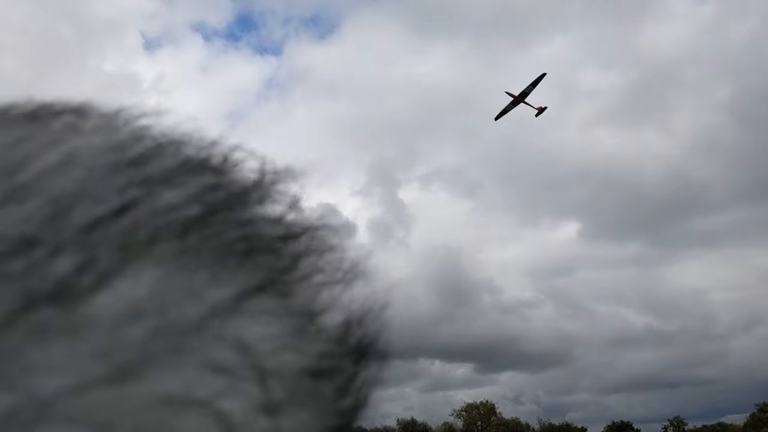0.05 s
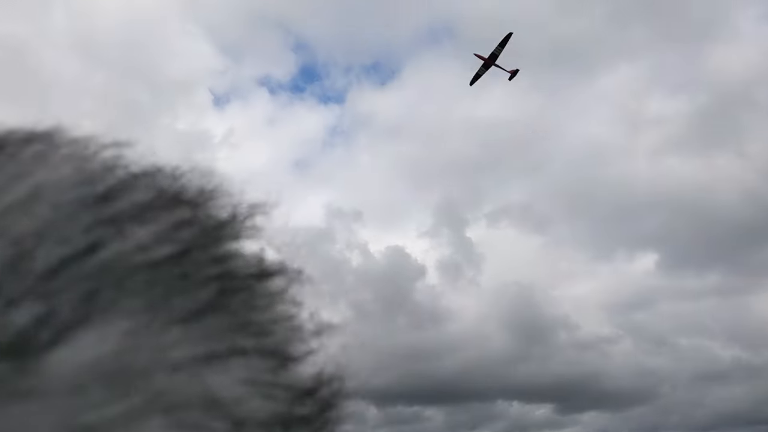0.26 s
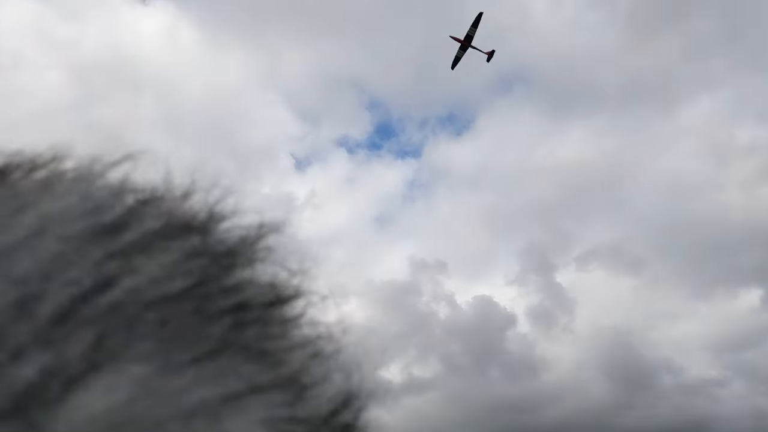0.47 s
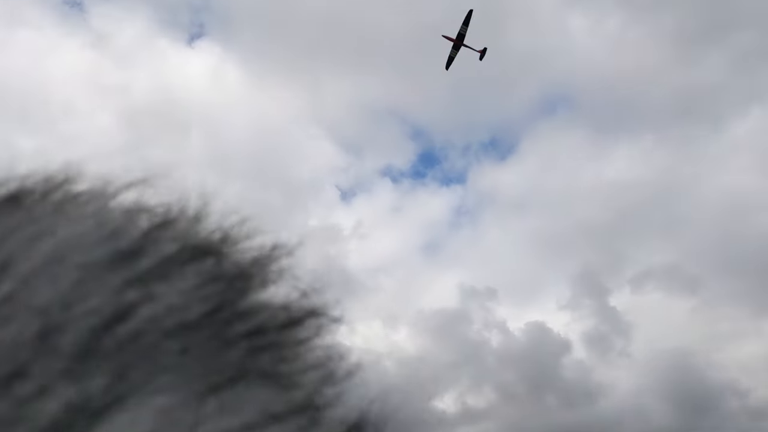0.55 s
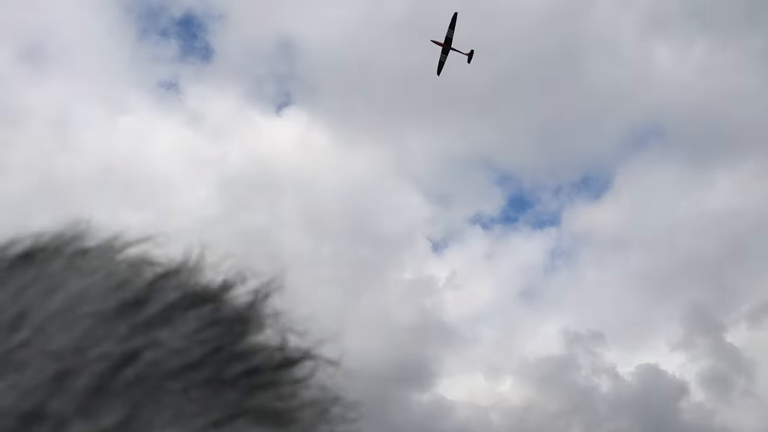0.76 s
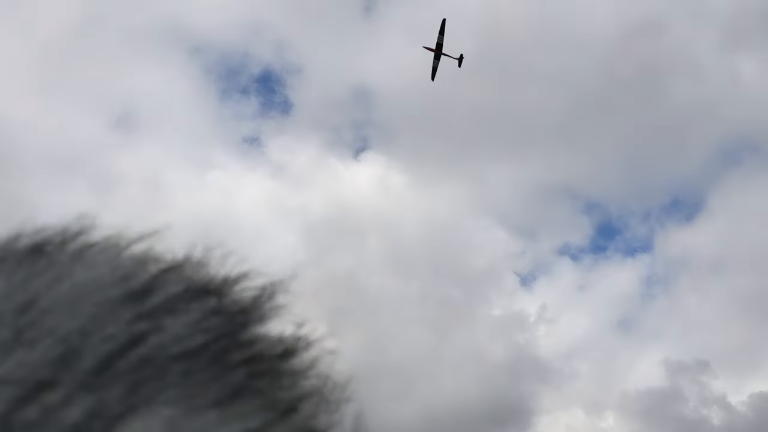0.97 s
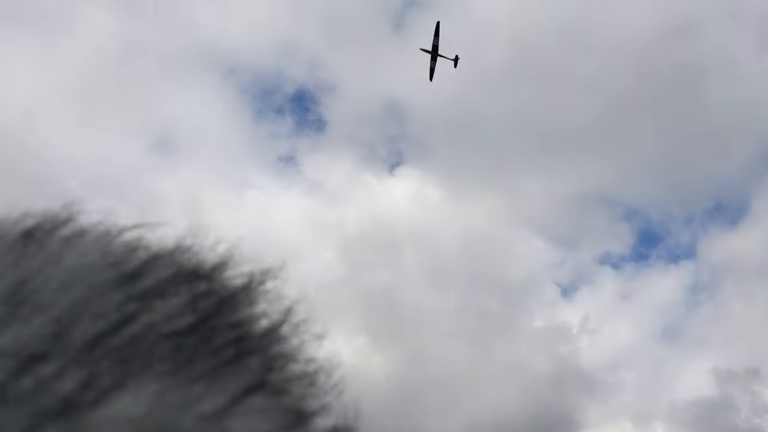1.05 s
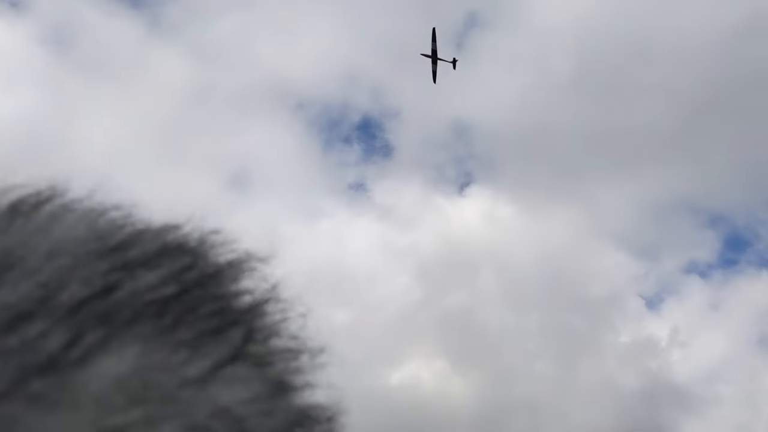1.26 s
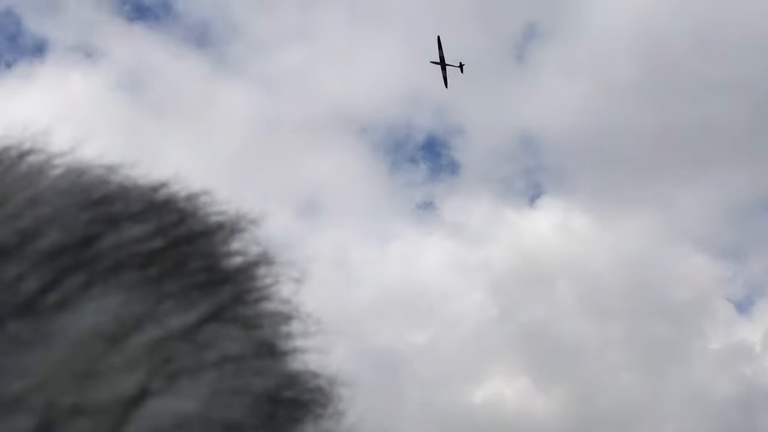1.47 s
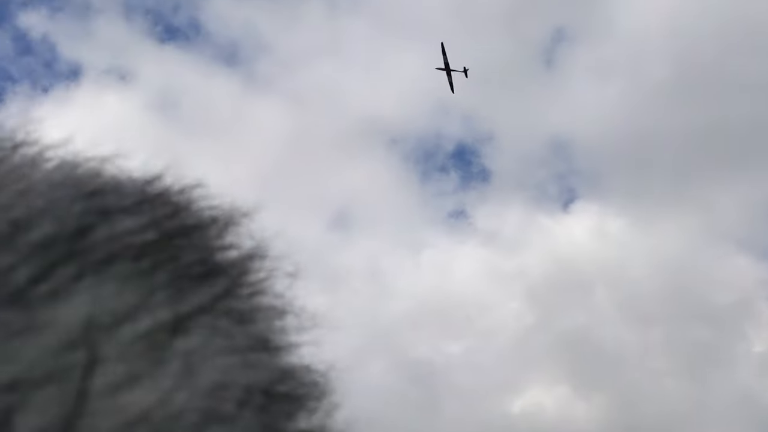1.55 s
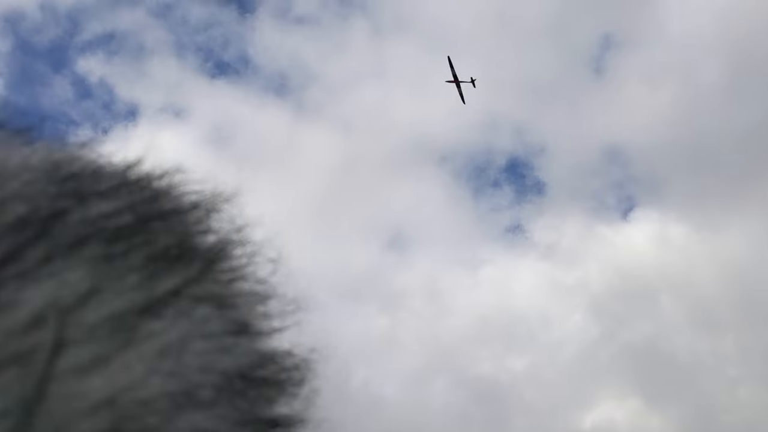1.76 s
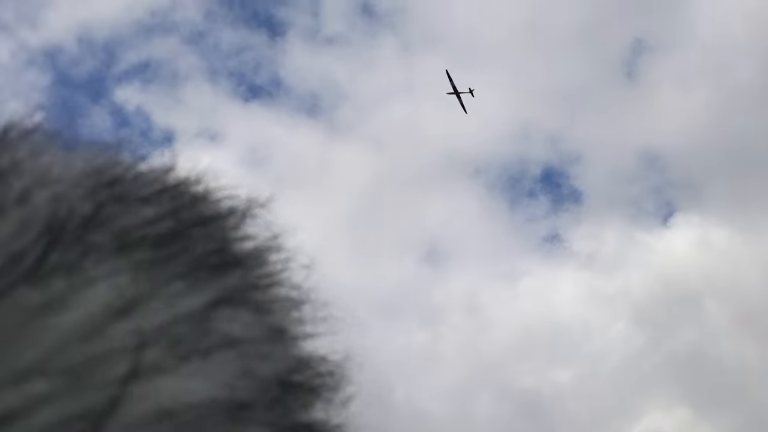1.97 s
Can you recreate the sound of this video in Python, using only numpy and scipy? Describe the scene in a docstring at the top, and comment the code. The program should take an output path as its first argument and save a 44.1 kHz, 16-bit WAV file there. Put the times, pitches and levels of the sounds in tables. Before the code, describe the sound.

A model plane sweeps close overhead in an open field: a turbulent roar and bright hiss swell quickly, a fuzzy whistle climbs to a thin whine, then the air fades. Close stereo microphones, duller on the left.

```python
"""For two seconds a small model plane passes fast overhead in an open field, over a low rumble and faint air.
From the start, air tears over it as shaped noise: a roar, a rush and a gusty hiss that swell as it nears.
A fuzzy whistle, a wavering tone mixed with narrow noise, climbs as it turns in, then holds as a thin whine.
Near the end the airflow and whine fall away. A close pair of microphones hears the plane,
the left one later and duller."""
import sys
import numpy as np
from scipy import signal
from scipy.fft import rfft, irfft
from scipy.io import wavfile
from scipy.ndimage import uniform_filter1d

SR = 44100
rng = np.random.default_rng(int(sys.argv[2]) if len(sys.argv) > 2 else 0)


def unload_wav(signal):
    """Save mono or channel-first audio to the path in sys.argv[1] as 16-bit WAV at rate SR, clipped to [-1, 1]."""
    wavfile.write(
        sys.argv[1],
        SR,
        np.round(np.clip(np.atleast_2d(signal).T, -1, 1) * 32767).astype(np.int16),
    )


N = 88200  # samples: two seconds

TURN_S = (.45, 1.0)  # the turn from approaching to overhead starts and ends here
FRAME, HOP = 512, 128  # short-time spectra: length and step in samples

# Level of the treble hiss, which surges and dips: (time [s], level [dB])
HISS = [(0, -29), (0.05, -17), (0.13, -14.5), (0.15, -18.5), (0.2, -15.5), (0.275, -3.5), (0.39, -5),
        (0.43, -0.3), (0.47, -2.3), (0.52, -1.5), (0.58, 5.5), (0.62, -3.1), (0.68, 5.7), (0.76, -1.9),
        (0.81, -3), (0.87, -10), (0.925, 5.1), (0.955, 2.5), (0.982, 4.6), (1.017, -10), (1.057, 5),
        (1.1, 1.3), (1.135, 2.8), (1.165, -7.8), (1.21, -1.3), (1.26, -3.9), (1.29, 0.2), (1.315, -4),
        (1.34, 1), (1.38, 3.4), (1.44, -6.5), (1.52, -3.8), (1.61, -5.5), (1.655, -2), (1.695, -2.3),
        (1.72, -11), (1.775, -23), (1.83, -19), (1.845, -22), (1.87, -17.5), (1.93, -27.5), (2, -27.8)]
# How strongly each pitch belongs to the hiss: (frequency [Hz], share [0-1])
HISS_BAND = [(4000, 0), (7000, .75), (9500, 1)]


def amp(db):
    """Turns decibels into gain."""
    return 10 ** (np.asarray(db) / 20)


def unit(x):
    """Scales to an rms of 1."""
    return x / np.sqrt(np.mean(x ** 2) + 1e-20)


def curve(points, at):
    """Reads a two-column table along straight lines."""
    return np.interp(at, *np.transpose(points))


def spectrum(points, hz):
    """Reads every value column of a table on a log-frequency axis."""
    table_hz, *columns = np.transpose(points)
    return [np.interp(np.log(hz + 1), np.log(table_hz), column) for column in columns]


def frames(x):
    """Splits sound into short-time spectra: frequencies as a column, times, values."""
    hz, t, z = signal.stft(x, SR, nperseg=FRAME, noverlap=FRAME - HOP)
    return hz[:, None], t, z


def sound(z):
    """Turns short-time spectra back into samples."""
    return signal.istft(z, SR, nperseg=FRAME, noverlap=FRAME - HOP)[1][..., :N]


def noise():
    """White noise of 0 dB per Hz."""
    return rng.standard_normal(N) * np.sqrt(SR / 2)


def narrow_noise(hz, width_hz):
    """Noise through two equal resonance stages, each width_hz wide, moved up to the pitch hz."""
    r = np.exp(-np.pi * width_hz / SR)
    z = rng.standard_normal(2 * N) + 1j * rng.standard_normal(2 * N)
    for _ in range(2):
        z = signal.lfilter([1 - r], [1, -r], z)
    z = z[N:]  # the first half only lets the filter settle
    turns = np.cumsum(hz * np.ones(N)) / SR
    return unit((z * np.exp(2j * np.pi * turns)).real)


def wander(per_s):
    """Random wavering of rms 1 with no motion quicker than per_s cycles a second."""
    slow_enough = np.fft.rfftfreq(N, 1 / SR) < per_s
    return unit(irfft(rfft(rng.standard_normal(N)) * slow_enough, N))


def passing(table, hz, t):
    """Blends a table from its approaching to its overhead column as the plane turns in."""
    # Early on, the treble already has part of its overhead values: (time [s], share [0-1])
    early_share = [(.15, .6), (.27, 0)]
    before, after = spectrum(table, hz)
    share = np.interp(t, TURN_S, [0, 1]) + curve(HISS_BAND, hz) * curve(early_share, t)
    return before + (after - before) * share


def background():
    """Faint outdoor air is noise shaped by pitch; the low rumble is noise in a narrow resonance."""
    # Outdoor air: (frequency [Hz], level [dB per Hz])
    floor = [(15, -76), (35, -66.5), (65, -78), (100, -81.5), (160, -84.5), (1000, -90), (2700, -106),
             (15000, -115)]
    rumble_hz, rumble_width_hz, rumble_db = 47.7, 6.2, -50.5
    same = 0.86  # likeness of the air at the two microphones (0-1)
    gain = amp(spectrum(floor, np.fft.rfftfreq(N, 1 / SR))[0])
    left, other = irfft(rfft([noise(), noise()]) * gain, N)
    right = same * left + np.sqrt(1 - same ** 2) * other
    rumble = amp(rumble_db) * narrow_noise(rumble_hz, rumble_width_hz)
    return np.array([left, right]) + rumble


def airflow():
    """Turbulent air is noise with moving levels; gives two unrelated draws as short-time spectra."""
    # Colour before the moving levels: (frequency [Hz], approaching [dB per Hz], overhead [dB per Hz])
    air_colour = [(231, -65, -68), (450, -67, -66.5), (626, -66.5, -60.5), (930, -69, -63),
                  (1280, -58.5, -54.5), (1637, -60.5, -60.5), (2150, -67, -62.5), (2500, -67.5, -61),
                  (2950, -63, -60), (3610, -66.5, -56.7), (4000, -65.5, -57.5), (5400, -63.5, -59),
                  (6100, -56, -61), (6350, -58.5, -57.5), (7670, -61.5, -61), (8440, -63, -55.5),
                  (8450, -64.5, -52.5), (9200, -56.5, -56), (10840, -55.5, -55.5), (13800, -67.5, -63.5),
                  (15900, -78, -70.5)]
    # Level of the low roar: (time [s], level [dB])
    roar_level = [(0, -7), (0.12, -1.5), (0.33, -0.5), (0.6, 2.8), (0.8, 0), (0.98, 1), (1.3, -1),
                  (1.6, -2.5), (1.67, 1.9), (1.76, -5.5), (2, -6)]
    # Level of the middle rush: (time [s], level [dB])
    rush_level = [(0, -14.0), (0.13, -8), (0.22, -10), (0.3, -4), (0.48, 0), (0.61, 0.1), (0.67, 6),
                  (0.76, 0), (0.83, 2), (0.9, 2), (1.08, 0.5), (1.29, 1.5), (1.5, -3.5), (1.69, -4),
                  (1.73, -9.5), (1.9, -12.5), (1.96, -18.5), (2, -15)]
    # How strongly each pitch follows the roar: (frequency [Hz], share [0-1])
    roar_band = [(250, .4), (1300, 1), (3000, 0)]
    # How strongly each pitch follows the rush: (frequency [Hz], share [0-1])
    rush_band = [(1300, 0), (3000, 1), (4500, 1), (7000, .35), (9500, 0)]
    # How strongly each pitch follows the drifting patches: (frequency [Hz], share [0-1])
    patch_band = [(600, .3), (4000, 1)]
    patch_db, flicker_db = 1.83, .5  # rms of the patches and the flicker at full share
    doppler_per_s, overhead_s = 0.046, 1.0  # the colour slides down by this share a second

    hz, t, z = frames(noise())
    # turbulence: patches in pitch and time, and a quick flicker of the treble
    patches = uniform_filter1d(rng.standard_normal(z.shape), size=7, axis=0)
    patches = unit(uniform_filter1d(patches, size=12, axis=1))
    flicker = unit(uniform_filter1d(rng.standard_normal(len(t)), size=3))
    emitted_hz = hz * np.exp(doppler_per_s * (t - overhead_s))  # unshifted when overhead

    db = passing(air_colour, emitted_hz, t)
    db = db + patch_db * curve(patch_band, hz) * patches
    db = db + curve(roar_band, hz) * curve(roar_level, t)
    db = db + curve(rush_band, hz) * curve(rush_level, t)
    db = db + curve(HISS_BAND, hz) * (curve(HISS, t) + flicker_db * flicker)
    return np.array([z, frames(noise())[2]]) * amp(db)


def whistle():
    """A thin wavering tone in a breathy skirt of noise: it climbs, settles, and surges with the hiss."""
    # Pitch: (time [s], frequency [Hz])
    whistle_pitch = [(.1, 8200), (.2, 8900), (.26, 9500), (.33, 10200), (.42, 11150), (.48, 11950),
                     (.59, 13000), (.75, 12680), (1.05, 12630), (1.18, 12700), (1.33, 12600), (1.8, 12570)]
    # Strength, added to the hiss level: (time [s], level [dB])
    whistle_level = [(.19, -37), (.27, -16), (.41, -14.5), (.5, -21.5), (.57, -33), (.7, -35), (.8, -31),
                     (.95, -29), (1.25, -25), (1.4, -30), (1.65, -30.5), (1.78, -42)]
    climb_skirt, hold_skirt = .8, .25  # share of the power in the skirt
    skirt_width_hz = 600  # width of each resonance stage
    waver_hz, waver_per_s, flutter_db = 55, 60, 2.5  # rms of pitch, top speed, rms of level

    t = np.arange(N) / SR
    hz = curve(whistle_pitch, t)
    skirt = np.interp(t, TURN_S, [climb_skirt, hold_skirt])
    turns = np.cumsum(hz + waver_hz * wander(waver_per_s)) / SR
    core = unit(np.sin(2 * np.pi * turns) * amp(flutter_db * wander(waver_per_s)))
    tone = np.sqrt(1 - skirt) * core + np.sqrt(skirt) * narrow_noise(hz, skirt_width_hz)
    return tone * amp(curve(whistle_level, t) + curve(HISS, t))


def plane():
    """Airflow and whistle reach the right microphone first and the left one later and shaded.
    Near 2.8 and 8.3 kHz the two are about equally loud and half a cycle apart,
    so they largely cancel there if the two channels are added together."""
    # Left against right level: (frequency [Hz], approaching [dB], overhead [dB])
    shade = [(200, 0.4, 0.5), (900, -1, -1.7), (1400, -4, -3), (1800, -6.5, -6), (2150, -2, -1),
             (2450, 1, 1), (2650, 0, 0.2), (3000, -0.2, -0.1), (3700, -3, -4), (5400, -8.5, -7),
             (6200, -6, -4), (7000, -8.5, -4), (7700, -4, -1), (8200, 0, -2), (8550, -0.3, -4),
             (9000, -6, -7), (9800, -13, -13), (11000, -19, -17), (12000, -14, -20), (12650, -15, -13.5),
             (13500, -27, -22), (15000, -29, -25)]
    # Likeness of the airflow at the two microphones: (frequency [Hz], likeness [0-1])
    likeness = [(200, .99), (1400, .98), (1950, .86), (2250, .85), (2450, .96), (2600, .9995),
                (3000, .9995), (3200, .95), (3600, .87), (5400, .8), (6200, .9), (7600, .8), (8150, .96),
                (8500, .96), (8900, .85), (10200, .82), (11000, .65), (12650, .75), (14000, .3)]
    # Lag of the left microphone: (time [s], lag [ms])
    lag_ms = [(0, .189), (.25, .183), (.42, .187), (.7, .181), (.95, .174), (1.1, .179), (1.25, .174),
              (1.6, .172), (2, .165)]
    # Phase that the body holding the microphones adds at the left:
    # (frequency [Hz], approaching [radians], overhead [radians])
    bend = [(200, 0, 0), (1300, -.4, -.25), (1750, -.15, -.2), (2150, .65, .7), (2550, -.08, 0),
            (3000, .1, -.02), (4000, -.3, 0), (5800, .5, .55), (7600, 1.1, .7), (8100, .05, .1),
            (8600, .5, 0), (9100, -.4, 0), (10500, .1, .3), (12500, 1.1, 1.6)]
    low_cut_hz = 232

    hz, t, tone = frames(whistle())
    air, other = airflow()
    same = np.clip(spectrum(likeness, hz)[0], 0, 1)
    left_air = same * air + np.sqrt(1 - same ** 2) * other
    left = (left_air + tone) * amp(passing(shade, hz, t))
    lag_phase = 2 * np.pi * hz * curve(lag_ms, t) / 1000
    left = left * np.exp(1j * (passing(bend, hz, t) - lag_phase))
    right = air + tone
    low_cut = signal.butter(6, low_cut_hz, "high", fs=SR, output="sos")
    return signal.sosfilt(low_cut, sound(np.array([left, right])))


def scene():
    """The plane over the quiet field."""
    return plane() + background()


def record(dry):
    """The recorder rounds off the highest peaks, then cuts the top of the treble."""
    knee, ceiling = .55, .85  # rounding starts at the knee and nears the ceiling (full scale = 1)
    edge_hz = 16000
    room = ceiling - knee
    under = np.clip(dry, -knee, knee)
    rounded = under + room * np.tanh((dry - under) / room)
    low_pass = signal.firwin(511, edge_hz, window=("kaiser", 9), fs=SR)
    return signal.oaconvolve(rounded, low_pass[None], "same")


dry = scene()
out = record(dry)
unload_wav(out)
```